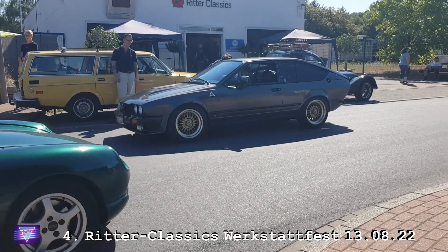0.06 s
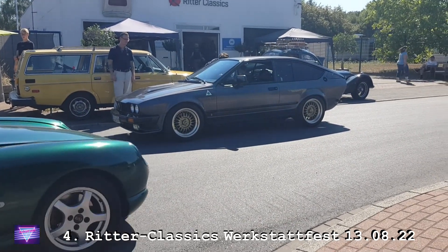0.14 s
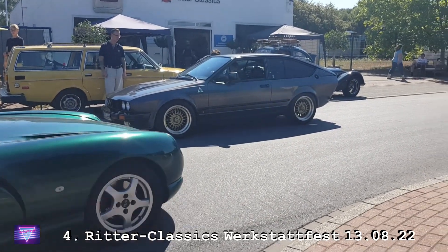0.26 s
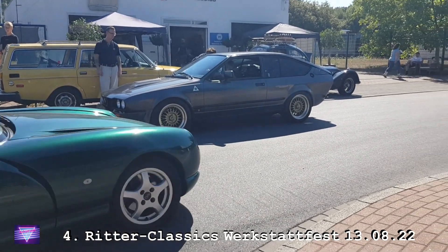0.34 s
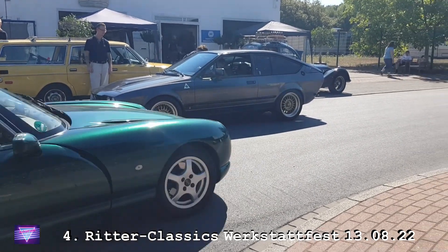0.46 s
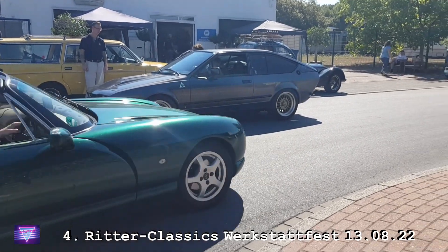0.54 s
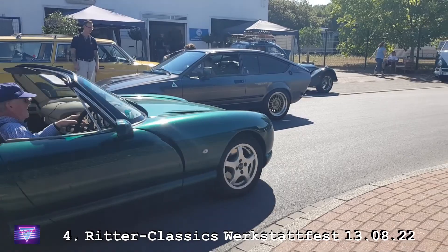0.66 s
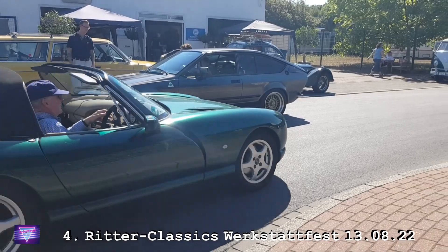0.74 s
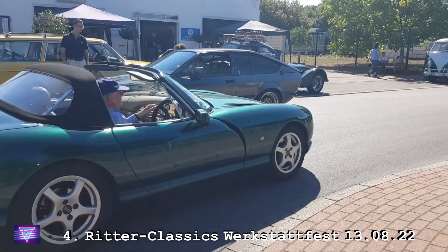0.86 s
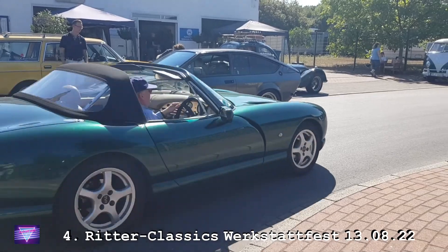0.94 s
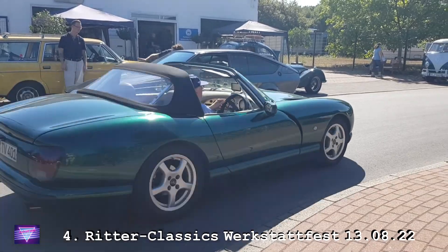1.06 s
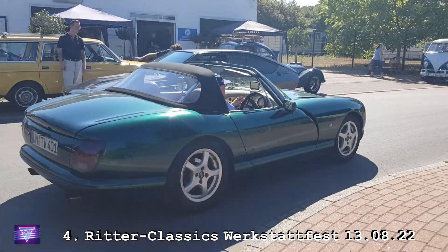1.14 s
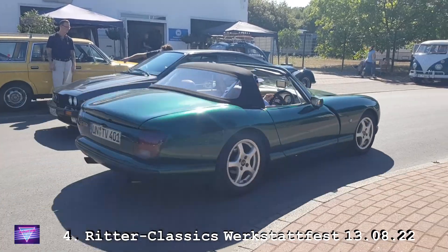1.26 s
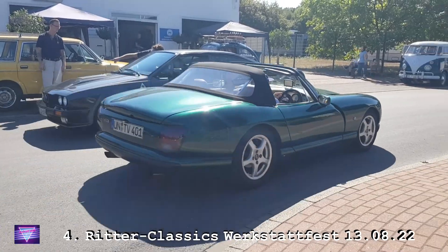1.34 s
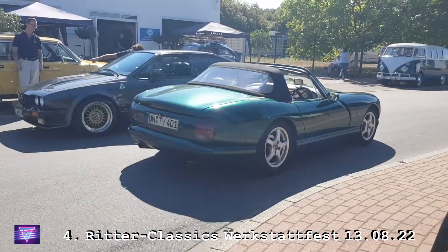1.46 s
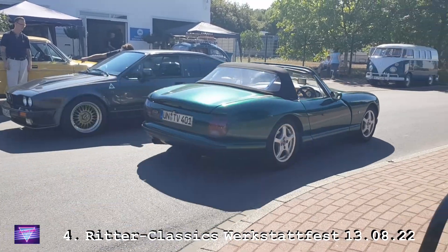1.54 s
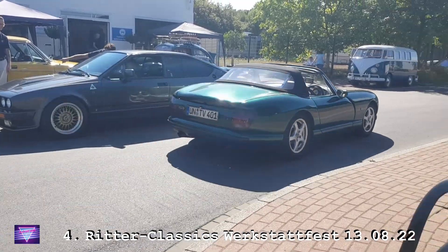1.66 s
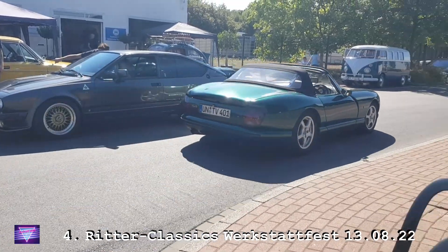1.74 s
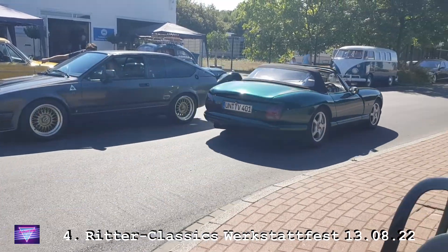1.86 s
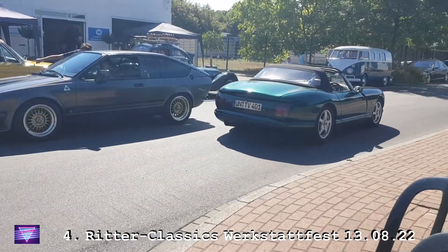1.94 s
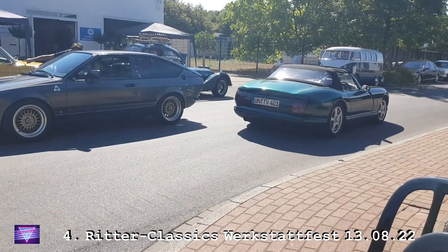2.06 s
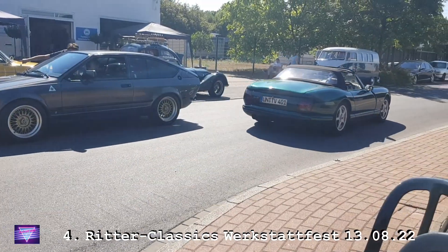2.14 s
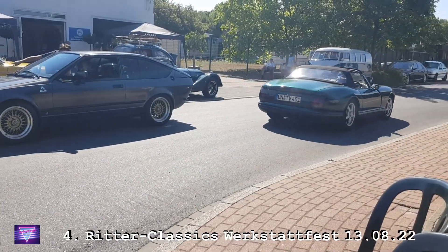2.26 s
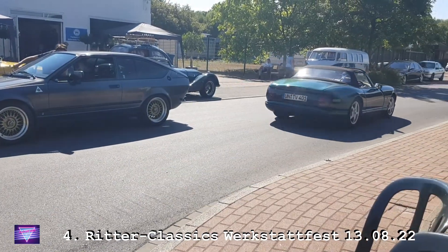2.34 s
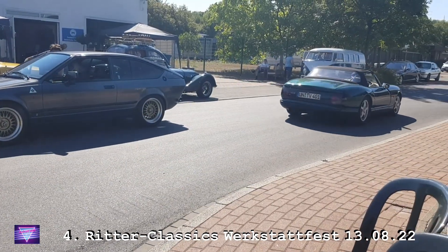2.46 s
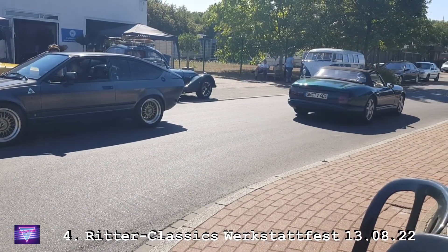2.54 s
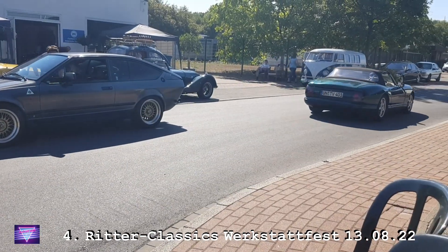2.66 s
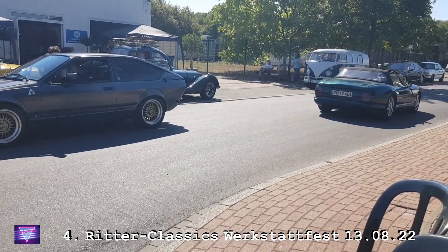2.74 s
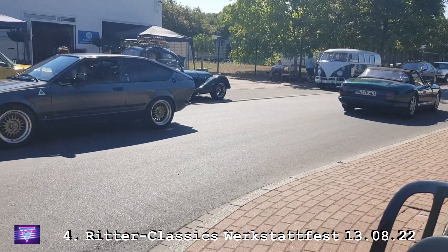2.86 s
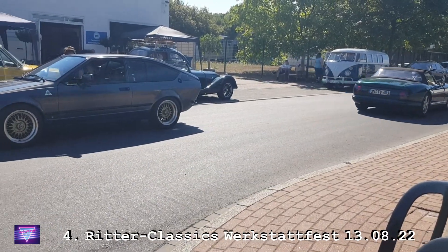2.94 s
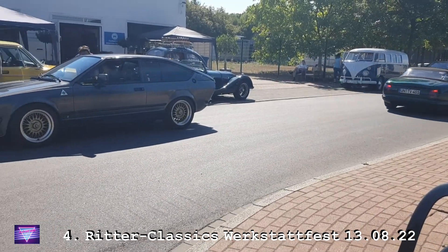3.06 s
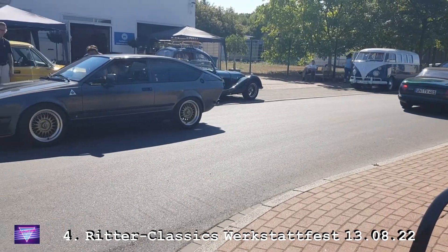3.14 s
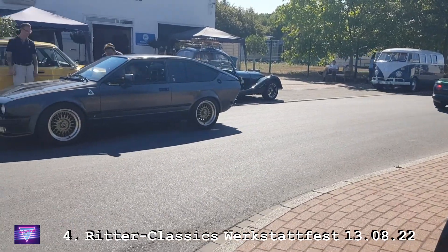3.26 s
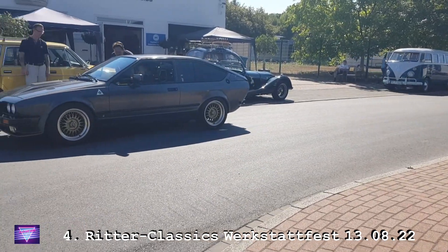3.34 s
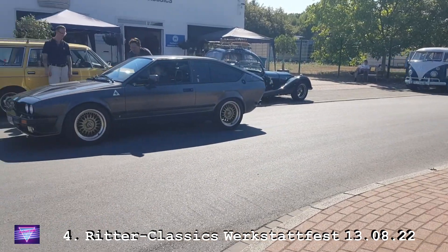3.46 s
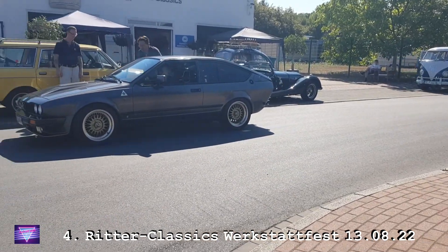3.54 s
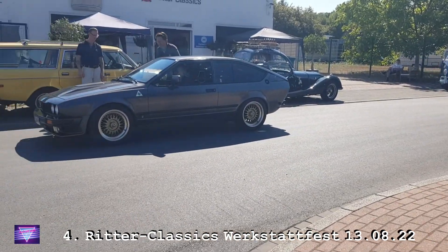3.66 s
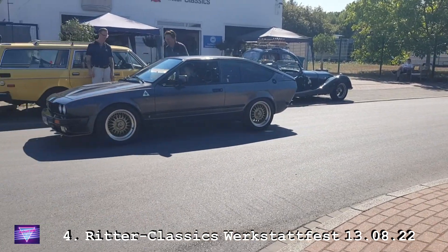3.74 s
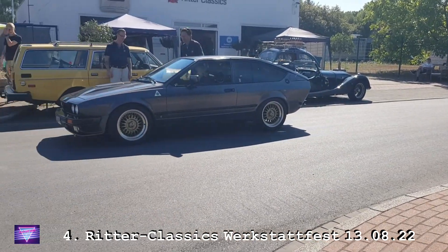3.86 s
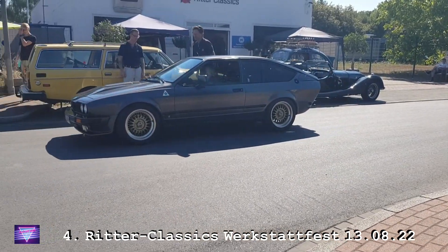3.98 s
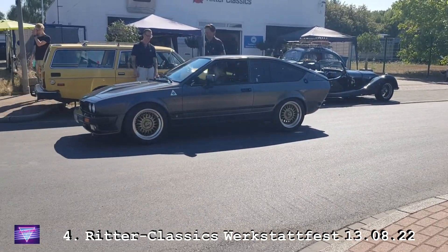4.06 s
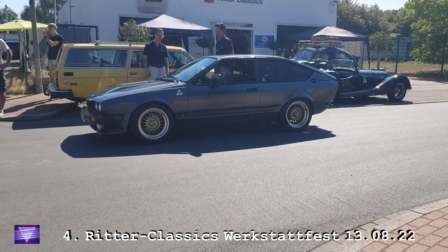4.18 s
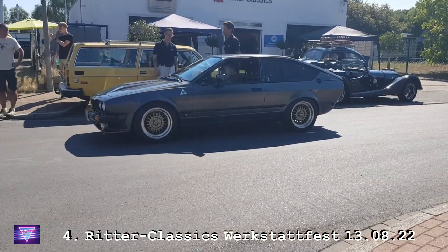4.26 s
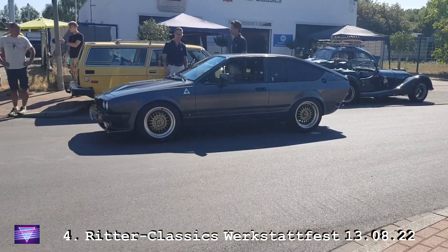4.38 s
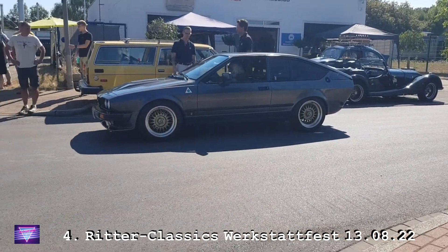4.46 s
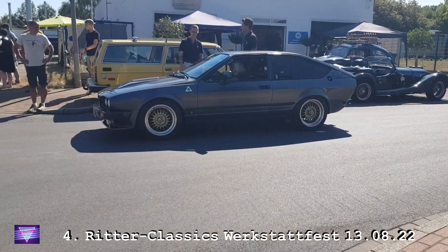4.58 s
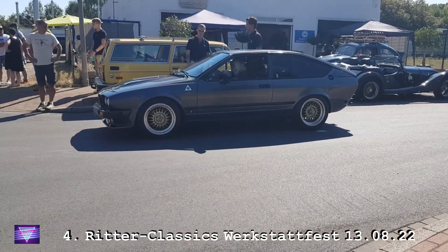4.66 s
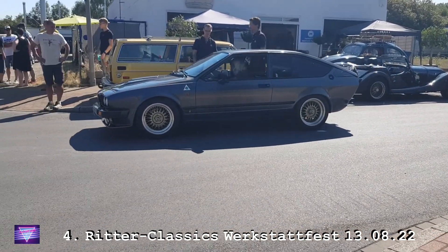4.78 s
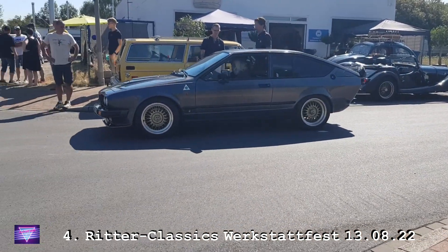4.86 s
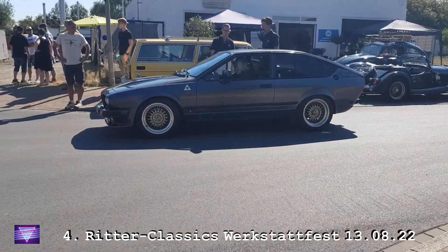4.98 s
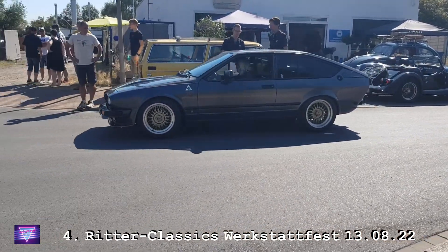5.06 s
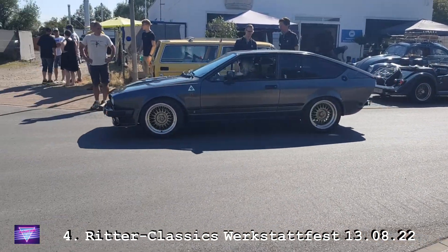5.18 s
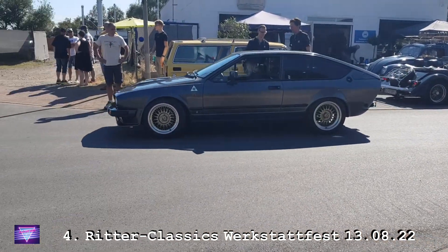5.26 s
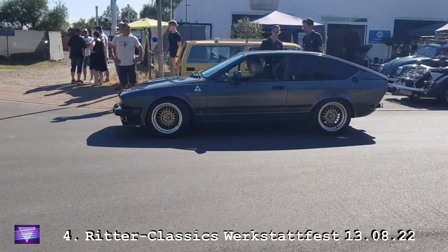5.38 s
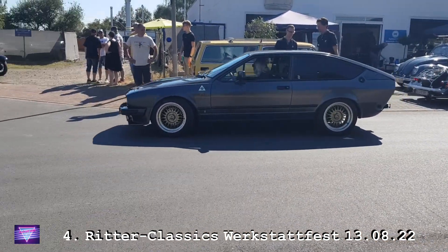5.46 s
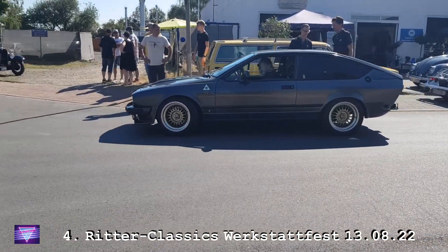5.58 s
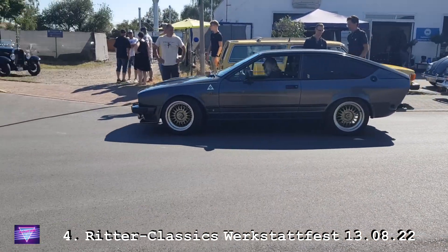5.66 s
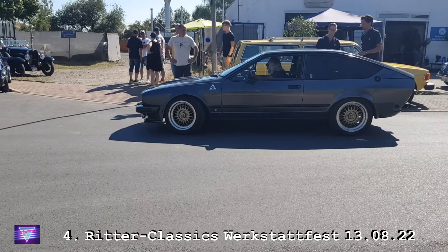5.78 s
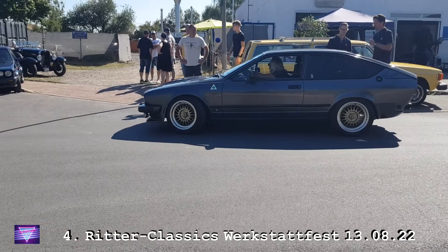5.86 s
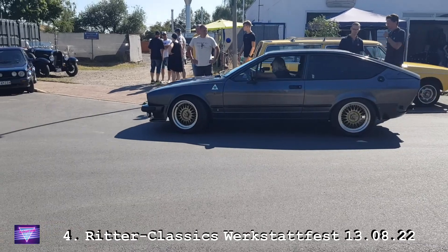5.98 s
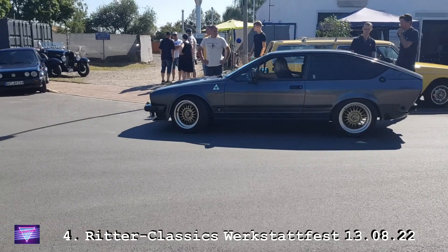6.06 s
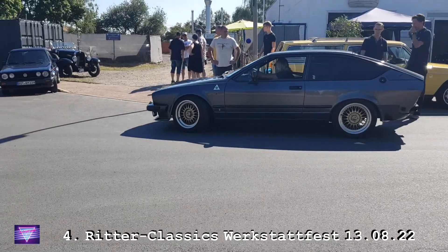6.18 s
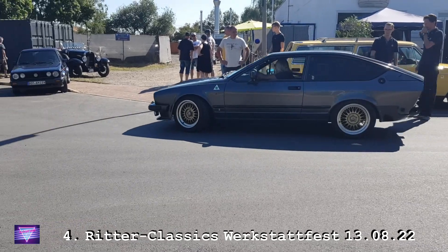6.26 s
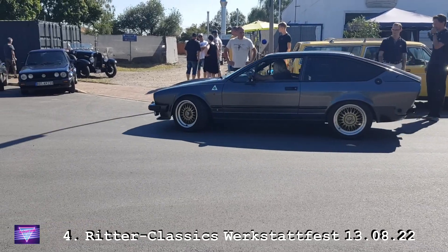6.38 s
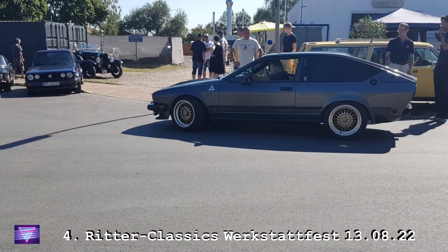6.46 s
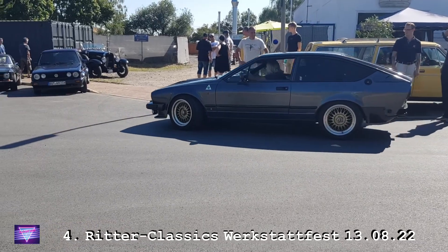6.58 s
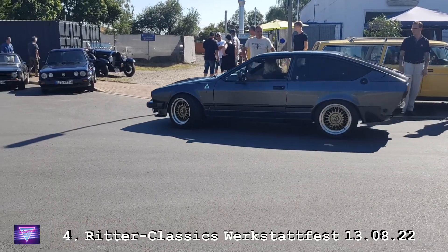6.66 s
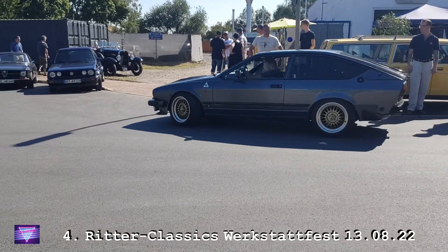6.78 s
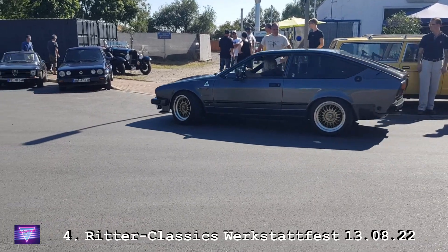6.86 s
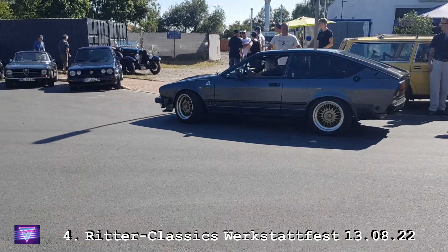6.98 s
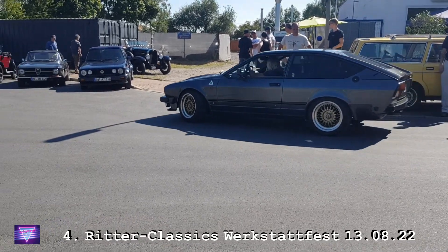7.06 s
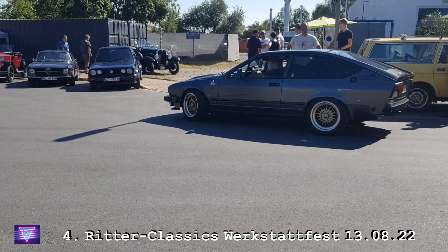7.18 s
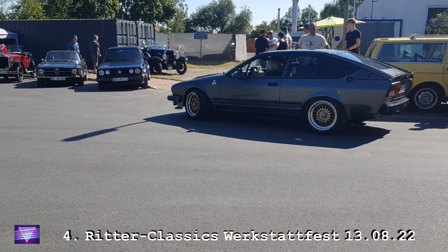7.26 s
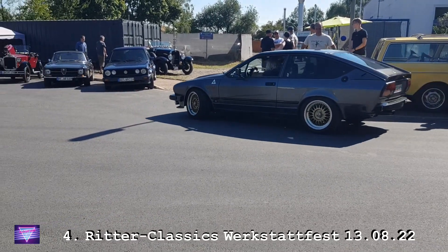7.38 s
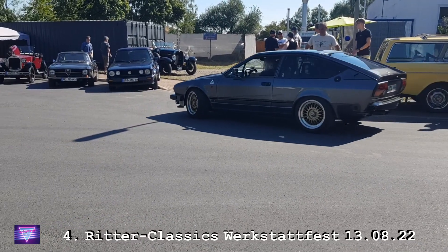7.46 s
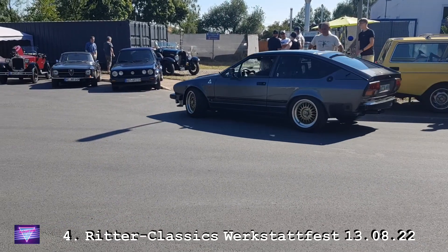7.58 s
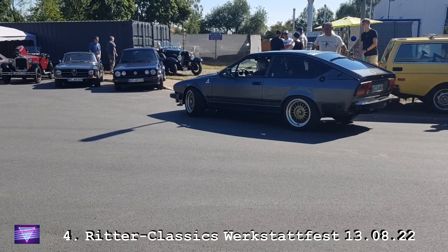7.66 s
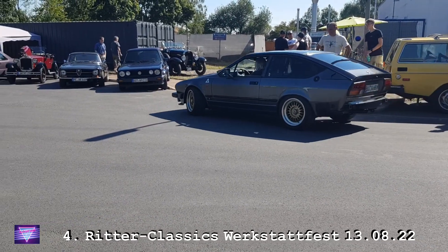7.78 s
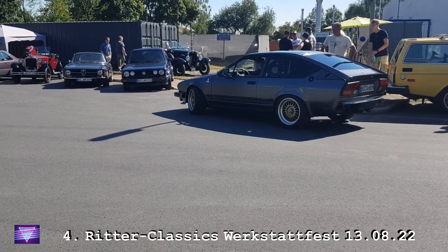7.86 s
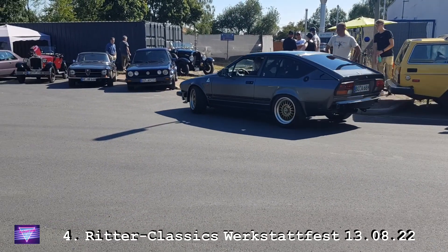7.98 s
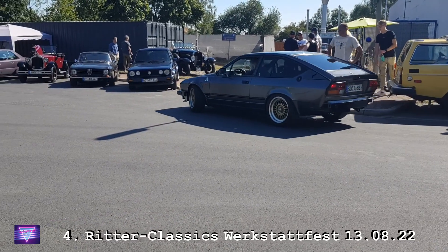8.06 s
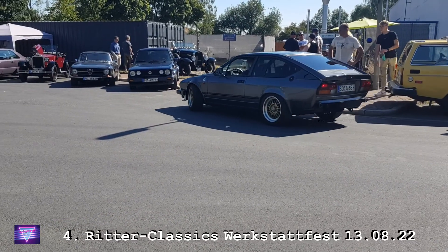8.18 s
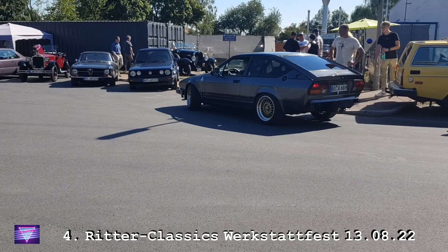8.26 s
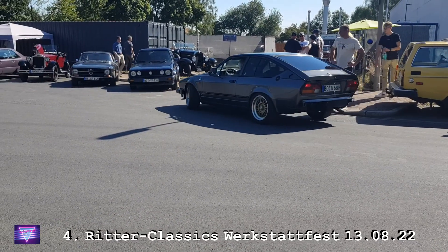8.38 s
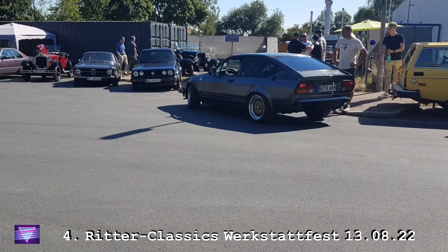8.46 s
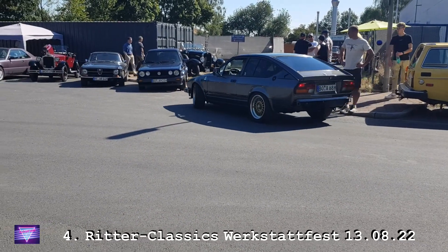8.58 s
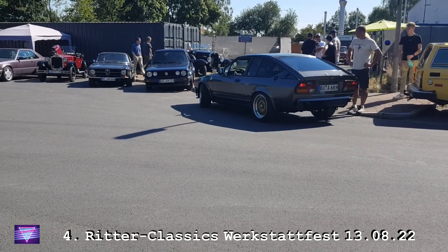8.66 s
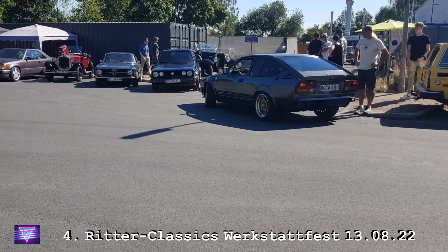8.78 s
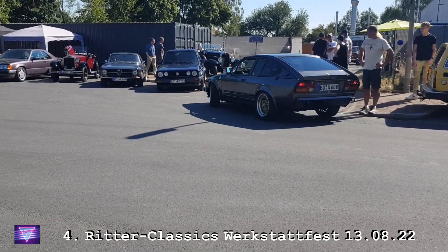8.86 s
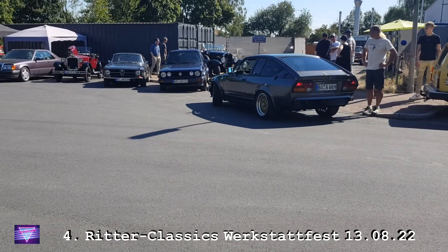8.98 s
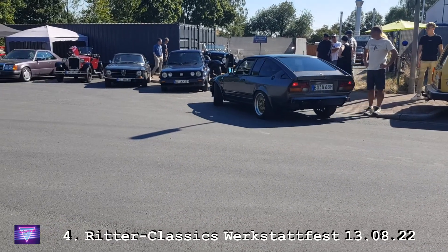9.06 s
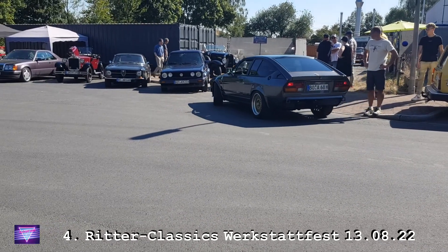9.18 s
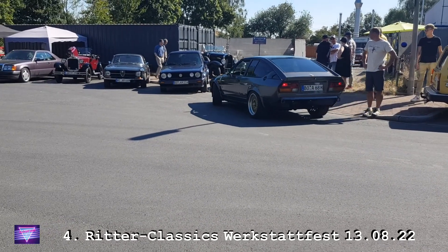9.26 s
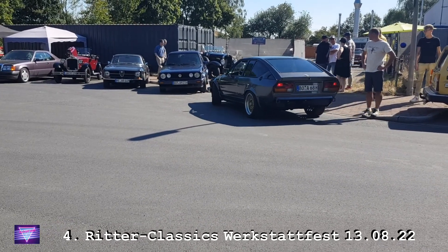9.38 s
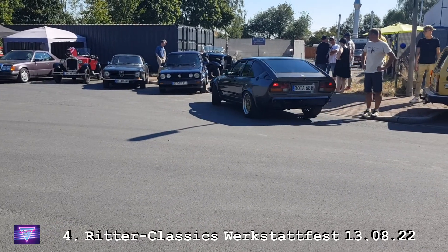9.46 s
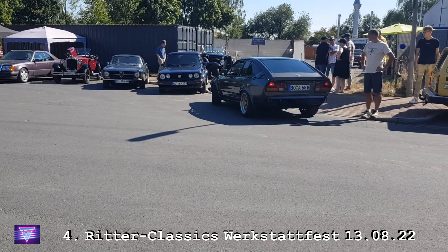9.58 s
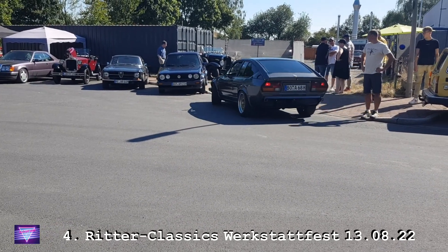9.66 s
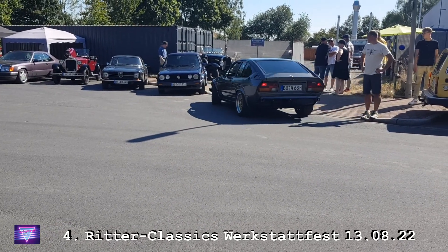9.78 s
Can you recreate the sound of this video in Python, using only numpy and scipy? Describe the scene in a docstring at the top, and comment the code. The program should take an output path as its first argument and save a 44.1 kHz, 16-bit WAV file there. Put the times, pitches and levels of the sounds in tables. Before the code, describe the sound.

In an open asphalt yard, an eight-cylinder roadster rolls past close to the microphones, its deep exhaust tone and soft rasp swelling at about two seconds, then dropping away fast. An old six-cylinder coupe idling several metres off remains, droning and booming with light valve clatter. It lifts its revs slightly, slips the clutch and creeps away, tyres rolling softly and grit snapping. Stereo, duller on the left.

```python
"""Open air on an asphalt yard, two microphones, the left one duller than the right.
A V8 roadster rolls past close by and pulls away: lines of its firing cycle, a rasp, and the rush of fan and belts.
A V6 coupe idles some 8 m off, slips its clutch and creeps off to 13 m.
Sines and pulses ringing pipes make the bass burble and boom; shaped noise makes valve clatter, whirr and tyre roll.
Short noise bursts are grit snapping under tyres; one faint chirp and a hiss of air lie behind."""
import sys
import numpy as np
from scipy import signal
from scipy.fft import rfft, irfft, next_fast_len
from scipy.io import wavfile
from scipy.ndimage import map_coordinates

SR = 44100
rng = np.random.default_rng(int(sys.argv[2]) if len(sys.argv) > 2 else 0)


def log_audio(samples):
    """Write samples as a 16-bit WAV file to the path given in sys.argv[1]."""
    # one column per channel
    frames = np.atleast_2d(samples).T
    # limit to full scale, then quantise
    limited = np.clip(frames, -1, 1)
    pcm = np.round(limited * 32767).astype(np.int16)
    wavfile.write(sys.argv[1], SR, pcm)


N = 433483  # length in samples

# colour of the coupe's tailpipe: frequency_hz, level_db (per Hz)
TAILPIPE_COLOUR = [(60, -51.5), (110, -14.5), (128, -7.5), (143, 1), (158, -2), (180, -10), (207, -21.5),
                   (265, -26.5), (305, -29.5), (350, -38.5), (550, -46), (900, -82)]
# colour of a silencer's boom, strongest near 48 Hz: frequency_hz, level_db (per Hz)
SILENCER_COLOUR = [(15, -37.5), (31, -36), (39, -19), (44, -3.5), (48, -2), (54, -8), (61, -11), (73, -4),
                   (100, -10.5), (135, -31.5), (300, -101.5)]
# the coupe's cylinders in firing order: relative_strength (above the mean, no unit), valve_gear_db
COUPE_CYLINDERS = [(1, 2), (-.6, 2.5), (-.3, 1), (.5, -2), (-.9, -3), (.3, -1.5)]


def amp(db):
    """Decibels to gain."""
    return 10 ** (np.asarray(db) / 20)


def unit(x):
    """Scaled to rms 1."""
    return x / np.sqrt(np.mean(x ** 2) + 1e-20)


def along(points, hz):
    """Values at hz, read from (Hz, value) points on a log frequency axis."""
    f, v = np.transpose(points)
    return np.interp(np.log(hz + 1), np.log(f + 1), v)


def curves(rows):
    """One value per sample for each column after the time in seconds."""
    s, *columns = np.transpose(rows)
    return [np.interp(np.arange(N) / SR, s, column) for column in columns]


def wobble(rate):
    """A smooth random curve through rate random knots a second."""
    knots = rng.standard_normal(int(N * rate / SR) + 4)
    return map_coordinates(knots, [np.arange(N) * rate / SR])


def filtered(x, response):
    """The signal x with its spectrum multiplied by a response of frequency."""
    m = next_fast_len(N + SR // 2)
    return irfft(rfft(x, m) * response(np.fft.rfftfreq(m, 1 / SR)), m)[..., :N]


def ring(spectrum, size=16384):
    """The minimum-phase answer of a pipe with this colour to one pulse, peak 1."""
    cepstrum = irfft(np.log(amp(along(spectrum, np.fft.rfftfreq(size, 1 / SR)))))
    # folding the cepstrum forward in time makes the answer causal
    cepstrum[1:size // 2] *= 2
    cepstrum[size // 2 + 1:] = 0
    answer = irfft(np.exp(rfft(cepstrum)))
    return answer / np.abs(answer).max()


def rush(spectrum):
    """Coloured stereo noise, alike on both sides in the bass only; its mid part has rms 1."""
    # how alike the two microphones hear noise: frequency_hz, likeness (0-1)
    likeness = [(200, 1), (400, 0.7), (750, 0.67), (1400, 0.22), (2800, 0.07), (6000, 0)]

    def mid_and_side(hz):
        angle = np.arccos(np.clip(along(likeness, hz), -1, 1)) / 2
        return amp(along(spectrum, hz)) * [np.cos(angle), np.sin(angle)]

    mid, side = filtered(rng.standard_normal((2, N)), mid_and_side)
    return np.array([mid + side, mid - side]) / np.std(mid)


def firing_samples(firings):
    """The samples at which the running count of firings passes a whole number."""
    return np.flatnonzero(np.diff(np.floor(firings)))


def yard_air():
    """The faint hiss of the open yard is steady coloured noise."""
    # colour of the open air: frequency_hz, level_db (per Hz)
    air_colour = [(20, 4.5), (200, 14), (1000, 11.5), (3000, 3.5), (6000, -4), (9000, -6.5), (11500, -0.5),
                  (15500, -5)]
    return amp(-63.0) * rush(air_colour)


def chirp():
    """One faint, high chirp: a narrow band of noise under a bell-shaped envelope."""
    centre_s, half_length_s, level_db = 4.82, .04, -65
    pitch_hz, width_hz = 5500, 600
    band = unit(filtered(rng.standard_normal(N), lambda hz: np.exp(-((hz - pitch_hz) / width_hz) ** 2)))
    envelope = np.exp(-((np.arange(N) / SR - centre_s) / half_length_s) ** 2)
    return amp(level_db) * envelope * band


def tyres():
    """Tyres roll on the asphalt as low, unsteady noise, first the roadster's, then the coupe's."""
    # level of the rolling: time_s, level_db
    tyre_level = [(2.6, -48.5), (3.2, -52.5), (5.5, -51.5), (6.5, -56), (7.7, -53), (9.83, -56.5)]
    # colour of the rolling: frequency_hz, level_db (per Hz)
    rolling_colour = [(150, -10.5), (400, -2.5), (550, -0.5), (800, -5.5), (950, -11), (2000, -15.5),
                      (5000, -29.5), (12000, -48)]
    return amp(curves(tyre_level)[0] + 1.5 * wobble(25)) * rush(rolling_colour)


def swell(pass_s, level_db, rise_db, fall_db):
    """Gain of something going by: one slope in dB/s (rise_db) up to pass_s, then a steady fall in dB/s."""
    t = np.arange(N) / SR - pass_s
    return amp(level_db + rise_db * np.minimum(t, 0) - fall_db * np.maximum(t, 0))


def roadster_fan():
    """The fan rushes by as broad noise: level until it has passed, then fading."""
    # colour of the fan: frequency_hz, level_db (per Hz)
    fan_colour = [(300, -22), (900, -7.5), (1300, -4), (2900, 1), (4500, -4.5), (5400, -5), (6500, -14),
                  (9300, -18), (11500, -11), (15500, -20.5)]
    passing = swell(pass_s=0.8163, level_db=-42.5, rise_db=0, fall_db=9)
    return passing * amp(0.78 * wobble(30)) * rush(fan_colour)


def roadster_belt():
    """The belts rush as a high band of noise that fades slowly, then fast."""
    # colour of the belts: frequency_hz, level_db (per Hz)
    belt_colour = [(4000, -38.5), (5200, -6.5), (5600, -0.5), (6200, -7.5), (7500, -12), (10000, -32)]
    passing = swell(pass_s=0.55, level_db=-49, rise_db=-8, fall_db=17)
    return passing * amp(1.2 * wobble(40)) * rush(belt_colour)


def roadster_rasp(cycles, count):
    """Unequal cylinders make a growl with lines one cycle rate apart; gas rasps at the pipes once a cycle."""
    # colour of the rasp: frequency_hz, level_db (per Hz)
    rasp_colour = [(200, -28.5), (380, -7), (460, 6), (530, -5.5), (600, 0.5), (690, -8.5), (770, -5.5),
                   (950, -11), (1300, -16.5), (3000, -36.5)]
    at = firing_samples(cycles * count)
    pulses = np.zeros(N)
    # a lasting strength for each cylinder, plus a little chance at each firing
    pulses[at] = np.resize(rng.standard_normal(count), len(at)) + .15 * rng.standard_normal(len(at))
    # echoes inside the mufflers smear the pulses into a roar
    echo_t60_s = .3
    echoes = rng.standard_normal(SR // 5) * amp(-60 * np.arange(SR // 5) / SR / echo_t60_s)
    smear = signal.fftconvolve(ring(rasp_colour), echoes)
    growl = unit(signal.fftconvolve(pulses, smear)[:N])
    gas = unit(amp(2.6 * np.cos(2 * np.pi * cycles))) * rush(rasp_colour)
    passing = swell(pass_s=1.55, level_db=-42.5, rise_db=2.6, fall_db=15)
    return passing * (.6 * growl + .75 * gas)


def roadster_exhaust(cycles, cycle_rate):
    """Uneven banks sound many multiples of the cycle rate; low ones make the tone, high ones the bark."""
    # lines of the exhaust: order (multiple of the four-stroke cycle rate), relative_db
    exhaust_lines = [(5, -18.5), (8, 1), (10, -11), (11, -12), (12, -16), (13, -7), (14, -5.5), (15, -10.5),
                     (16, -1.5), (17, -15), (18, -17), (20, -21), (21, -18.5), (22, -22), (23, -15.5),
                     (24, -21.5), (25, -23), (26, -23.5), (27, -24.5), (28, -27.5), (30, -33), (31, -32.5),
                     (32, -24.5)]
    # the mufflers lift or damp each line as it glides: frequency_hz, gain_db
    muffler_gain = [(120, 0), (143, 3), (165, 0), (195, 1), (222, -7), (232, 1), (350, 0), (375, -3),
                    (395, -14)]
    low, high = np.zeros(N), np.zeros(N)
    for order, db in exhaust_lines:
        gain_db = db + along(muffler_gain, order * cycle_rate) + 1.2 * wobble(8.9)
        line = amp(gain_db) * np.sin(2 * np.pi * (order * cycles + rng.random()))
        if order < 20:
            low += line
        else:
            high += line
    tone = swell(pass_s=2.12, level_db=-19.5, rise_db=2, fall_db=25) * unit(low)
    bark = swell(pass_s=1.05, level_db=-33.5, rise_db=-1.5, fall_db=20) * unit(high)
    return tone + bark


def roadster(count=8):
    """Eight cylinders share one engine cycle, which drives exhaust and rasp; fan and belts rush beside them."""
    # engine speed: time_s, firing_rate_hz
    roadster_speed = [(0, 94), (.65, 89.3), (1.25, 88), (1.55, 96), (2, 104.5), (2.17, 110), (2.4, 99),
                      (3.2, 91)]
    rate = curves(roadster_speed)[0]
    cycles = np.cumsum(rate * (1 + .002 * wobble(12))) / SR / count
    exhaust = roadster_exhaust(cycles, rate / count)
    return exhaust + roadster_rasp(cycles, count) + roadster_fan() + roadster_belt()


def snap(hz, t60):
    """A stone cracks: a broad burst around its own pitch and a duller knock below it, peak 1."""
    t = np.arange(SR // 8) / SR

    def band(low_hz, high_hz):
        burst_noise = rng.standard_normal(len(t)) * amp(-60 * t / t60)
        b, a = signal.butter(3, [low_hz, min(high_hz, .45 * SR)], "band", fs=SR)
        return signal.lfilter(b, a, burst_noise)

    burst = band(hz * .45, hz * 1.46) + 0.51 * band(hz * 0.26, hz * 0.37)
    return burst / np.abs(burst).max()


def grit(count=22):
    """A few stones snap loudly under the tyres; many small ones tick as the coupe turns away."""
    # single stones: start_s, peak_db, pitch_hz, t60_s
    stones = [(3.737, -37, 800, .035), (4.271, -53, 7800, 0.091), (4.555, -54, 6460, .015),
              (6.477, -38, 1092, 0.12), (6.966, -33, 2400, 0.04), (7.468, -53, 8500, 0.018),
              (7.526, -34, 2400, 0.023), (7.721, -46, 6000, 0.035), (7.726, -48.5, 10250, .03),
              (8.359, -48, 5000, .03), (8.549, -48.5, 8038, .015), (8.765, -53.5, 9100, 0.046),
              (9.02, -49, 4500, 0.13), (9.097, -39.5, 745, 0.032), (9.268, -54.5, 8900, 0.036)]
    small = [(7.6 + 2.1 * when, -62 + 9 * size, 4000 + 8000 * pitch, .012)
             for when, size, pitch in rng.random((count, 3))]
    out = np.zeros(N + SR)
    for start_s, peak_db, hz, t60 in stones + small:
        crack = amp(peak_db) * snap(hz, t60)
        out[round(start_s * SR):][:len(crack)] += crack
    return out[:N]


def panels(x):
    """Sheet metal around an engine rings briefly in many close modes, here a decaying noise tail."""
    t60_s, share = .035, .45  # share: size of the ringing against the direct sound
    t = np.arange(SR // 10) / SR
    tail = rng.standard_normal((2, len(t))) * amp(-60 * t / t60_s)
    rung = signal.fftconvolve(x, tail / np.linalg.norm(tail[0]), axes=1)[:, :N]
    return (x + share * rung) / np.hypot(1, share)


def coupe_bay(firings, rate):
    """Valve gear ticks with every firing, loudest on two cylinders, so it flutters once a cycle; pulleys whirr."""
    # colour of the engine bay: frequency_hz, level_db (per Hz)
    clatter_colour = [(600, -21), (1000, -7.5), (1500, -2), (2100, -1.5), (2500, -.5), (3000, 0.5),
                      (4000, -1), (5300, -9), (6200, -20), (7000, -16), (8500, -24.5), (11500, -14),
                      (15500, -26)]
    # resonances of belts and pulleys: frequency_hz, width_hz, level_db
    pulley_bands = [(1068, 45, 3), (1365, 87, -3), (1630, 3.9, -5), (2350, 110, -11.5)]
    # how far away the coupe is: time_s, distance_m
    coupe_distance = [(2.5, 8.4), (4.3, 8.5), (5.5, 7.56), (6.9, 7.2), (8.3, 8.65), (9.3, 12), (9.83, 13)]
    reference_m = 7
    doublings = np.log2(curves(coupe_distance)[0] / reference_m)
    rev_doublings = np.log2(rate / rate.mean())
    # level at the reference distance and mean revs, loss and gain per doubling
    clatter_db = -58.5 - 12 * doublings + 7 * rev_doublings
    whirr_db = -57 - 10 * doublings + 2 * rev_doublings

    ticks = np.exp(-3.5 * (firings % 1))
    firing = firings.astype(int)
    total = firing[-1] + 1
    cylinder_db = np.resize(np.array(COUPE_CYLINDERS)[:, 1], total)
    scatter_db = 1.5 * rng.standard_normal(total)
    surge = amp(cylinder_db + scatter_db)[firing]
    clatter = amp(clatter_db) * unit(surge * (1 + 1.1 * ticks)) * panels(rush(clatter_colour))

    def resonances(hz):
        return sum(amp(db) / (1 + ((hz - centre) / width) ** 2) for centre, width, db in pulley_bands)

    whirr = amp(whirr_db + 1.5 * wobble(5)) * unit(filtered(rush(clatter_colour), resonances))
    return clatter + whirr


def chuffs():
    """Single strong firings ring the tailpipe and the silencer together."""
    # heavy exhaust beats as the load changes: start_s, pulse_db (before the pipes ring)
    beats = [(2.069, -15.5), (2.144, -11.5), (2.361, -17), (4.079, -16), (5.477, -14), (5.523, -14),
             (5.971, -16.5), (6.914, -17.5), (7.122, -19)]
    pulses = np.zeros(N)
    for start_s, pulse_db in beats:
        pulses[round(start_s * SR)] = amp(pulse_db)
    return signal.fftconvolve(pulses, -.6 * ring(TAILPIPE_COLOUR) - .5 * ring(SILENCER_COLOUR))[:N]


def uneven_firings(firings, pipe, imbalance):
    """What each firing has more or less than the mean rings the pipe: partly chance, partly its cylinder."""
    at = firing_samples(firings)
    strengths = np.resize(np.array(COUPE_CYLINDERS)[:, 0], len(at))
    pulses = np.zeros(N)
    pulses[at] = rng.uniform(-0.88, 1, len(at)) + imbalance * strengths
    return unit(signal.fftconvolve(pulses, ring(pipe))[:N])


def engine_line(firings, order):
    """A sine of rms 1 at a multiple of the firing rate, from a random phase."""
    return np.sqrt(2) * np.sin(2 * np.pi * (order * firings + rng.random()))


def low_booms(firings, rate):
    """Low booms near 48 Hz come now and then, the first ones from the roadster pulling away."""
    # booms: centre_s, half_length_s, peak_db
    booms = [(1.462, 0.098, -29.5), (2.099, 0.15, -31.5), (2.383, .07, -30.5), (4.169, 0.064, -28.5),
             (4.793, .3, -35), (5.513, 0.059, -31), (5.757, 0.11, -30.5), (6.091, 0.13, -27),
             (6.597, .2, -36.5), (7.1, 0.21, -27.5), (7.615, .12, -32), (8.037, 0.2, -30.5),
             (8.5, 0.16, -34.5), (9.379, .15, -32)]
    between_db = -38.5
    t = np.arange(N) / SR
    power = amp(between_db) ** 2
    for centre_s, half_s, db in booms:
        power = power + amp(db) ** 2 * np.exp(-((t - centre_s) / half_s) ** 2)
    # one firing-rate line, strong only where it meets the resonance, joins the ringing pulses
    first = amp(along(SILENCER_COLOUR, rate)) * engine_line(firings, order=1)
    return np.sqrt(power) * (uneven_firings(firings, SILENCER_COLOUR, imbalance=0.27) + first)


def coupe_note(firings, rate):
    """A drone at twice the firing rate, and overtones that swell where they cross the tailpipe's resonance."""
    # the note is full under load and thin while the clutch slips: time_s, drone_db, overtones_db
    pull = [(0, -22.5, -25.5), (0.5, -24, -32), (1.3, -21, -29), (2.3, -24, -23), (3.4, -23, -23.5),
            (4.65, -20.5, -25), (5.22, -20.5, -25), (5.45, -28.5, -27), (5.8, -31.5, -30),
            (6.2, -30.5, -28), (6.85, -32.5, -30.5), (7.15, -24, -33), (7.7, -21, -28.5),
            (8.7, -24.5, -26.5), (9.83, -25, -26.5)]
    # weights of the overtones: frequency_hz, relative_db
    overtone_colour = [(108, -13), (125, -4.5), (148, 0.5), (165, 0.5), (185, -21), (205, -22), (218, -16),
                       (232, -27), (255, -27), (271, -14), (285, -20)]
    pipe_hz, pipe_width_hz = 149.5, 12
    drone_db, tone_db = curves(pull)
    # the two banks differ, which adds a weak line at 1.5 times the firing rate
    banks = engine_line(firings, order=2) + amp(-15.5) * engine_line(firings, order=1.5)
    drone = amp(drone_db + .4 * wobble(35)) * banks

    orders = np.arange(3, 6)
    weights = np.array([amp(along(overtone_colour, k * rate)) for k in orders])
    resonance = np.sqrt(sum(1 / (1 + ((k * rate - pipe_hz) / pipe_width_hz) ** 2) for k in orders))
    overtones = sum(w * engine_line(firings, k) for k, w in zip(orders, weights))
    overtones = overtones / np.linalg.norm(weights, axis=0)
    return drone + amp(tone_db + 1.7 * wobble(11)) * resonance * overtones


def coupe_exhaust(firings, rate):
    """The engine's note, the burble of uneven firings and turbulent gas leaving the tailpipe."""
    # level of the burble: time_s, level_db
    burble_level = [(0, -38.5), (1.5, -31), (1.85, -25), (2.35, -23), (2.6, -28), (4.3, -30), (5.4, -32),
                    (5.9, -28.5), (6.4, -32), (9.83, -32)]
    # colour of the turbulent gas: frequency_hz, level_db (per Hz)
    gas_colour = [(130, -23.5), (190, 0.5), (260, 5), (305, -1.5), (350, -12.5), (500, -25.5), (1000, -58),
                  (3000, -110)]
    burble_db = curves(burble_level)[0]
    burble = amp(burble_db) * uneven_firings(firings, TAILPIPE_COLOUR, imbalance=.6)
    # more revs push more gas
    gas_db = -46.5 + 10 * np.log10(rate / rate.mean()) + 2.4 * wobble(12)
    gas = amp(gas_db) * rush(gas_colour)
    return coupe_note(firings, rate) + burble + gas


def scene():
    """Both cars over the faint hiss of the open yard; one unsteady engine speed paces the coupe and the booms."""
    # the coupe's engine speed: time_s, firing_rate_hz
    coupe_speed = [(0, 36.2), (.8, 37.2), (1.25, 38.6), (1.85, 46), (2.15, 50.5), (2.45, 49.6),
                   (2.88, 50.4), (3.97, 49.8), (4.3, 46.6), (4.6, 45.4), (5.11, 48), (5.28, 50.5),
                   (5.48, 56.5), (5.75, 56.6), (6.23, 53.8), (6.8, 54.4), (7.05, 46), (7.49, 38.3),
                   (7.85, 36.5), (8.4, 39.4), (9.83, 36.9)]
    rate = curves(coupe_speed)[0] * (1 + .003 * wobble(12))
    firings = np.cumsum(rate) / SR
    background = yard_air() + chirp() + tyres()
    coupe = grit() + coupe_bay(firings, rate) + chuffs() + coupe_exhaust(firings, rate)
    return background + roadster() + low_booms(firings, rate) + coupe


def record(dry):
    """The left microphone lags a little and loses treble; nothing is kept above the band limit."""
    # level between the microphones: frequency_hz, left_minus_right_db
    shade = [(60, 1), (170, 0.88), (380, -2), (700, -3.5), (1290, -6.5), (2380, -12), (4400, -11),
             (8000, -9), (15000, -9)]
    # phase by which the left microphone lags: frequency_hz, lag_rad
    phase_lag = [(45, .27), (75, 0.24), (150, 0.52), (250, 0.69), (600, 0.24)]
    top_hz = 15750

    def microphones(hz):
        pair = amp(np.outer([.5, -.5], along(shade, hz)))
        lag = np.exp(1j * np.outer([-.5, .5], along(phase_lag, hz)))
        # the pair's mean power stays the same at every frequency
        return lag * pair / np.sqrt(np.mean(pair ** 2, axis=0)) * (hz < top_hz)

    return filtered(dry, microphones)


dry = scene()
out = record(dry)
log_audio(out)
```